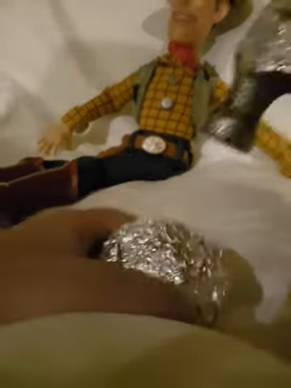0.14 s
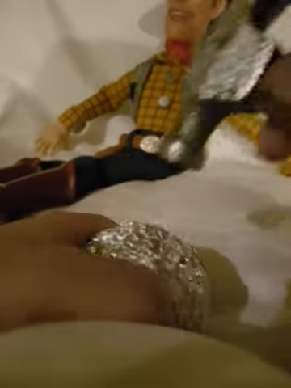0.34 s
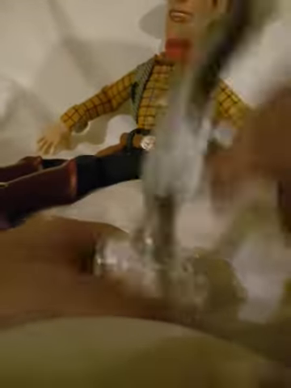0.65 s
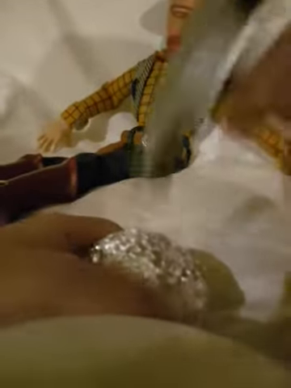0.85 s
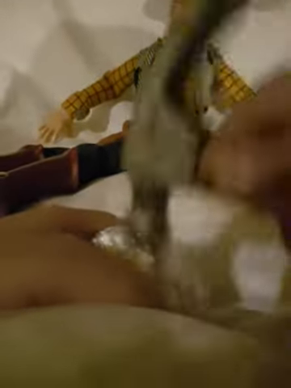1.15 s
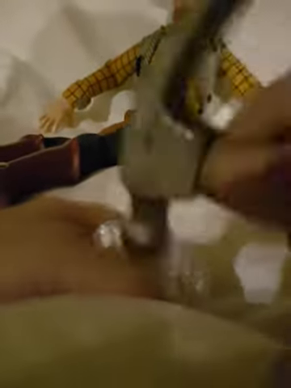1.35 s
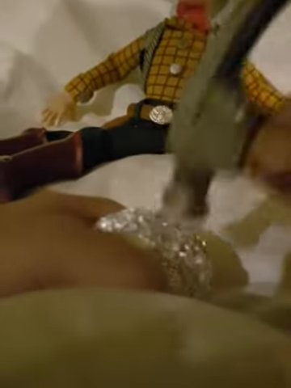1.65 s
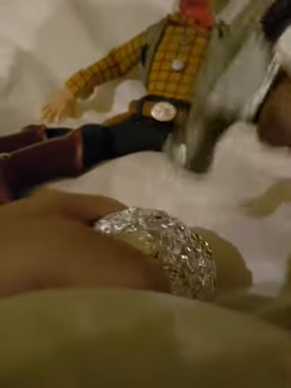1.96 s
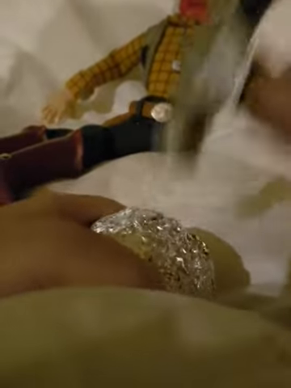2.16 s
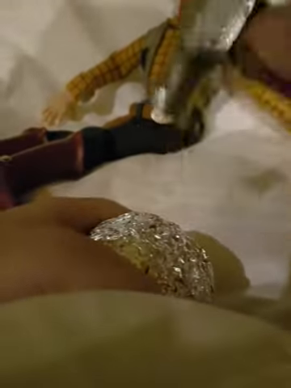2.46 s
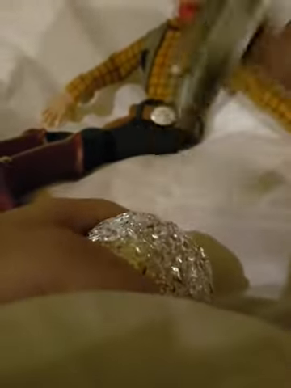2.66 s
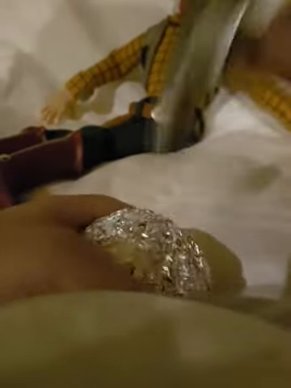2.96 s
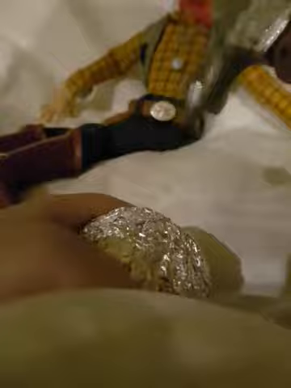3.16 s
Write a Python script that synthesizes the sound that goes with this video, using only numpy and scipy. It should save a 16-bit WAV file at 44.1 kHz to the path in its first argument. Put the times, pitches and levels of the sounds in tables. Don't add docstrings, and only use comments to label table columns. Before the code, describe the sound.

Hammer blows on a foil ball: a faint foil rustle first, then eleven quick even hits, each a short crack and soft thud, with cloth rubs between, in a small bedroom, very close stereo phone microphone.

```python
import sys
import numpy as np
from scipy import signal
from scipy.fft import rfft, irfft, next_fast_len
from scipy.io import wavfile
from scipy.ndimage import map_coordinates

SR = 44100
rng = np.random.default_rng(int(sys.argv[2]) if len(sys.argv) > 2 else 0)


def gain_from_decibels(decibels):
    exponent = np.asarray(decibels, float) / 20
    return 10 ** exponent


def put_to_file(sound):
    columns = np.atleast_2d(sound).T
    safe = np.clip(columns, -1, 1)
    whole_steps = np.round(safe * 32767)
    wavfile.write(sys.argv[1], SR, whole_steps.astype(np.int16))


N = 145530

# start in seconds, thud level in dB, crack level in dB,
# mattress heave level in dB, pitch of the hammer's ring in Hz.
BLOWS = [(0.7271, -16.5, -19, -16, 1900), (.9616, -13.5, -13.5, -15, 1830),
         (1.1882, -12.5, -16.5, -15.5, 1850), (1.4107, -10.5, -13.5, -14, 1770),
         (1.6492, -12.5, -18, -12, 1700), (1.8927, -8, -24, -10, 1800), (2.1191, -8.5, -13.5, -11, 1710),
         (2.3600, -5.5, -12.5, -10.5, 1800), (2.6110, -6, -10.5, -7, 1670), (2.8518, -9.5, -11, -8.5, 2100),
         (3.0857, -4.5, -10, -5, 1950)]
# firmness (a factor on the thud's pace),
# snap level in dB, sizzle level in dB, clink level in dB.
CONTACTS = [(1.1, -27, -25, -17), (1.15, -23, -27, -27), (1.16, -33, -32, -29), (1.18, -28, -27, -29),
            (1.08, -28, -30, -22), (1.07, -27, -26, -22), (.98, -24, -16, -18), (1.18, -24, -21, -15),
            (1.02, -28, -28, -16), (1.02, -16, -23, -12), (1.2, -18, -22, -15)]
# sign of the push, lag in seconds, starting pitch in Hz,
# time for the pitch to sag in seconds, gain in dB.
THUD_AT_PORTS = [
    (-1, 0, 205, .0063, 6.5),
    (1, .00022, 400, .0045, 9.5),
]
# pitch in Hz, level in dB, how late the first crest comes in seconds.
MATTRESS_SWINGS = [
    (37, -1.5, -.003),
    (75, 2, .001),
]
# start in seconds, bump level in dB, pitch in Hz,
# rattle level in dB.
KNOCKS = [(0.7476, -18, 420, -13.5), (0.797, -38, 285, -61), (0.7491, -7.5, 1310, -26),
          (0.7498, -4, 2440, -55), (0.9789, -6.5, 1460, -16.5), (1.0192, -25.5, 395, -49),
          (1.117, -27.5, 600, -43), (1.2068, -6, 1465, -15.5), (1.2306, -24, 367, -49),
          (1.4293, -16.5, 990, -15.5), (1.6592, -12, 1110, -9), (1.8976, -15.5, 229, -22.5),
          (1.9691, -26, 1650, -46), (2.1328, -17, 506, -37), (2.1395, -16.5, 139, -53),
          (2.3767, -3.5, 467, -24), (2.381, -9.5, 210, -58), (2.391, -14, 174, -41),
          (2.8667, -4, 460, -16.5), (2.8711, -8, 197, -54), (2.876, -21, 147, -52),
          (2.915, -36.5, 506, -55), (2.932, -31, 520, -51), (3.1422, -20.5, 487, -49)]
# middle in seconds, length in seconds,
# level in dB, dullness in dB.
STROKES = [(0.198, 0.64, -53.5, -13), (0.447, 0.051, -79, -24), (0.777, 0.17, -55.5, -14),
           (0.866, 0.088, -45, -7.5), (1.016, 0.19, -57.5, -14), (1.109, 0.086, -38.5, -1.5),
           (1.238, 0.13, -49.5, -9.5), (1.337, 0.094, -36, -2.5), (1.47, 0.17, -55, -9.5),
           (1.549, 0.07, -37, -2), (1.693, 0.18, -53.5, -14.5), (1.824, 0.055, -43.5, 1),
           (1.944, 0.18, -52, -12), (2.072, 0.091, -50, 1.5), (2.158, 0.065, -43.5, -12),
           (2.208, 0.12, -52.5, -6.5), (2.393, 0.11, -44.5, -12.5), (2.434, 0.15, -55.5, -11.5),
           (2.649, 0.12, -45.5, -12), (2.716, 0.063, -49.5, -7.5), (2.793, 0.33, -56.5, -4.5),
           (2.895, 0.14, -46.5, -8.5), (2.961, 0.064, -49, -12), (3.102, 0.059, -39.5, 7),
           (3.143, .1, -45, -8), (3.196, 0.053, -47.5, -6.5), (3.242, 0.069, -48.5, 0)]
# time in seconds, level in dB.
TICKS = [(0.089, -41.5), (.651, -49), (0.797, -31), (1.032, -33), (1.212, -46), (1.26, -36), (1.474, -42),
         (1.509, -50), (1.533, -51), (1.54, -50), (1.681, -34), (1.733, -41), (1.757, -36.5), (2.447, -43),
         (2.979, -38), (1.955, -29), (2.424, -31), (2.744, -36), (2.94, -20.5), (2.987, -36),
         (3.165, -23.5)]
# time in seconds, peak level in dB.
PLUCKS = [(.103, -38), (0.195, -23), (0.865, -35), (1.2311, -11), (1.3194, -30), (1.376, -34), (1.548, -22),
          (2.639, -16), (2.894, -14), (3.224, -35), (0.9073, -14), (1.1144, -19), (1.2481, -28),
          (1.387, -30), (1.476, -16), (1.71, -19), (1.9684, -39)]
# time in seconds, level in dB.
HISS_DRIFT = [(0, -55), (0.352, -51), (.6, -55.5), (1.1, -60.5), (1.6, -54), (2.1, -53.5), (2.5, -55),
              (2.8, -53.5), (3.3, -52)]

# frequency in Hz, level in dB.
FOIL_COLOUR = [(600, -10), (1500, 24), (4000, -14), (8000, -8.5), (12000, -6), (15000, -14), (16900, -48),
               (17100, -120)]
CRISP_COLOUR = [(2500, -30), (4500, -3), (9000, 0), (11000, -30)]
SIZZLE_COLOUR = [(9000, -30), (11000, 0), (13500, 0), (16000, -10), (17000, -60)]
DENT_COLOUR = [(300, -30), (600, -0.5), (1000, 3.5), (1700, -6.5), (2900, -6.5), (4500, -19.5), (6000, -29)]
CLOTH_COLOUR = [(200, -32), (350, -1), (750, -9), (1500, -4), (2600, -10.5), (5000, -24), (15700, -36.5),
                (15900, -120)]
ROOM_COLOUR = [(300, -5), (700, -0.5), (1500, 11.5), (2600, 0.5), (4000, -10.5), (8000, -18),
               (15700, -25.5), (15900, -120)]
RIGHT_PORT_COLOUR = [(2600, 1), (3500, -1.5), (5200, 1), (7600, 5.5), (8700, 1), (9500, -2.5), (11000, 1),
                     (13000, 2.5)]
RATTLE_COLOUR = [(300, 6.5), (800, 6.0), (1800, -2), (3000, -11.5),
                 (4000, -18), (8000, -23), (16000, -40), (17000, -120)]
# frequency in Hz, level in dB per Hz.
RUMBLE_COLOUR = [(12, -63), (20, -6), (139, 2.5), (157, -5.5), (262, -6.5), (338, -9), (409, -20),
                 (500, -29), (650, -48), (1100, -120)]
HISS_COLOUR = [(300, -24), (450, -7), (800, -8.5), (1400, -6), (2600, -11), (4000, -21), (15700, -31),
               (15900, -120)]
# frequency in Hz, time to fall by 60 dB in seconds.
ROOM_DECAY = [(200, 0.48), (1500, 0.12), (6000, 0.34), (15000, 0.64)]

THUD_END_HZ, THUD_RISE_S, THUD_FADE_S, THUD_HUM_DB, THUD_HUM_S = 80, .0025, .0034, -27, .04
RING_S, RING_SKEW, RING_SAG, RING_LEFT_DB = .0028, .6, .1, -6
CLINK_HZ, CLINK_DB = 3900, (-6, -11)
SNAP_DB, SNAP_FADE_S = (-4, -17), .0014
DENT_DB, DENT_S = -7, 0.00085
HEAVE_PEAK_S, HEAVE_FROM_S, HEAVE_RISE_S = .0145, .006, .009
HEAVE_TO_S, HEAVE_FADE_S, HEAVE_LEFT_DB = .045, .009, -30
SPRINGS_HZ, SPRINGS_WIDTH_HZ, SPRINGS_DB, SPRINGS_S, SPRINGS_LEFT_DB = 120, 91, -20, .03, -20
KNOCK_CYCLES, KNOCK_SAG, RATTLE_S, KNOCK_LEFT_DB = .7, .08, .0018, -26
DULL_HZ, FIBRES_PER_S, FIBRE_DB, FIBRE_SHARE, RUB_LEFT_DB = 2900, 3200, 12.5, 0.54, -44
TICK_S, TICK_RIGHT_DB, TICK_LOW_HZ = .0015, -4, 4000
TURN_S, TURN_LENGTH_S, TURN_DB = 0.21, 0.44, -47
PLUCK_DB, PLUCK_HZ, PLUCK_WIDTH_HZ = 4.5, 1940, 2700
RUMBLE_DB, RUMBLE_APART, HISS_DB, HISS_RIGHT_DB = -52.5, 0.28, -10, 2
ROOM_DB = -32
BLOW_TIME = np.arange(SR // 6) / SR


def unit(x):
    return x / np.sqrt(np.mean(x ** 2) + 1e-20)


def along(points, hz):
    f, v = np.transpose(points)
    return np.interp(np.log(hz + 1), np.log(f + 1), v)


def filtered(x, response):
    m = next_fast_len(N + SR // 4)
    return irfft(rfft(x, m) * response(np.fft.rfftfreq(m, 1 / SR)), m)[..., :N]


def noise(colour, channels=2):
    white = rng.standard_normal((channels, N))
    return unit(filtered(white, lambda hz: gain_from_decibels(along(colour, hz))))


def add(track, s, x):
    part = track[..., round(s * SR):round(s * SR) + x.shape[-1]]
    part += x[..., :part.shape[-1]]


def swell(t, peak_s):
    return t / peak_s * np.exp(1 - t / peak_s)


def left_quieter(db):
    return gain_from_decibels([[db], [0]])


def house_rumble():
    shared, apart = noise(RUMBLE_COLOUR)
    apart = RUMBLE_APART * apart
    return gain_from_decibels(RUMBLE_DB) * np.array([shared + apart, shared - apart])


def hiss():
    s, db = np.transpose(HISS_DRIFT)
    drift = gain_from_decibels(np.interp(np.arange(N) / SR, s, db) + HISS_DB)
    return drift * noise(HISS_COLOUR) * gain_from_decibels([[0], [HISS_RIGHT_DB]])


def foil_ticks():
    gate, t = np.zeros((2, N)), np.arange(SR // 50) / SR
    for s, db in TICKS:
        add(gate, s, gain_from_decibels(db + np.array([[0], [TICK_RIGHT_DB]])) * np.exp(-(t / (2 * TICK_S)) ** 2))
    turn = np.clip((np.arange(N) / SR - TURN_S) / TURN_LENGTH_S, -.5, .5)
    gate[0] += gain_from_decibels(TURN_DB) * np.cos(np.pi * turn)
    return filtered(gate * noise(FOIL_COLOUR), lambda hz: 1 / (1 + (TICK_LOW_HZ / (hz + 1)) ** 6))


def rubbing():
    slips = rng.random((2, N)) < FIBRES_PER_S / SR
    strength = gain_from_decibels(FIBRE_DB * np.minimum(rng.exponential(size=(2, N)), 2))
    fibres = slips * strength * rng.standard_normal((2, N))
    rough = FIBRE_SHARE * unit(fibres) + (1 - FIBRE_SHARE) * rng.standard_normal((2, N))
    cloth = unit(filtered(rough, lambda hz: gain_from_decibels(along(CLOTH_COLOUR, hz))))
    bright = filtered(cloth, lambda hz: 1 / (1 + (DULL_HZ / (hz + 1)) ** 4))
    t, out = np.arange(N) / SR, np.zeros((2, N))
    for s, length, db, dull_db in STROKES:
        stroke = np.cos(np.pi * np.clip((t - s) / length, -.5, .5)) ** 2.64
        out += gain_from_decibels(db) * stroke * (cloth - bright + gain_from_decibels(-dull_db) * bright)
    flutter = gain_from_decibels(2.1 * map_coordinates(rng.standard_normal(300), [t * 70]))
    return out * flutter * left_quieter(RUB_LEFT_DB)


def thread_plucks():
    snaps = np.zeros(N)
    for s, db in PLUCKS:
        snaps[round(s * SR)] = gain_from_decibels(db + PLUCK_DB)

    def response(f):
        width = 1j * f * PLUCK_WIDTH_HZ
        return width / (PLUCK_HZ ** 2 - f * f + width) / (1 + 1j * f / 5000)

    return filtered(snaps, response) * left_quieter(RUB_LEFT_DB)


def thud():
    out = np.zeros((2, N))
    for (s, thud_db, *_), (firm, *_) in zip(BLOWS, CONTACTS):
        for port, (sign, lag, start_hz, sag, db) in enumerate(THUD_AT_PORTS):
            u = np.maximum(BLOW_TIME - lag, 0) * firm
            turns = THUD_END_HZ * u + (start_hz - THUD_END_HZ) * sag * (1 - np.exp(-u / sag))
            fade = np.exp(-u / THUD_FADE_S) + gain_from_decibels(THUD_HUM_DB) * np.exp(-u / THUD_HUM_S)
            size = (1 - np.exp(-u / THUD_RISE_S)) * fade
            add(out[port], s, sign * gain_from_decibels(thud_db + db) * size * np.sin(2 * np.pi * turns))
    return out


def crack():
    out, t = np.zeros((2, N)), BLOW_TIME
    body = noise(DENT_COLOUR)
    crisp, sizzle = noise(CRISP_COLOUR, channels=1)[0], noise(SIZZLE_COLOUR, channels=1)[0]
    fade = np.exp(-t / SNAP_FADE_S)
    for (s, _, crack_db, _, hz), (_, snap_db, sizzle_db, clink_db) in zip(BLOWS, CONTACTS):
        now = slice(round(s * SR), round(s * SR) + len(t))
        dent = gain_from_decibels(crack_db + DENT_DB) * swell(t, DENT_S) * body[:, now]
        add(out, s - SNAP_FADE_S / 2, dent)
        snap = (gain_from_decibels(snap_db) * crisp[now] + gain_from_decibels(sizzle_db) * sizzle[now]) * fade
        clink_hz = CLINK_HZ * (1 + .03 * rng.normal())
        clink = gain_from_decibels(clink_db) * fade * np.sin(2 * np.pi * clink_hz * t)
        ring = np.sin(2 * np.pi * hz * t * (1 + RING_SAG * (1 - 2 * t / RING_S)) - 2.6)
        ring *= -np.sin(np.pi * np.clip(t / RING_S, 0, 1) ** RING_SKEW)
        for port, (_, lag, *_) in enumerate(THUD_AT_PORTS):
            add(out[port], s, gain_from_decibels(crack_db + RING_LEFT_DB * (1 - port)) * ring)
            foil = gain_from_decibels(SNAP_DB[port]) * snap + gain_from_decibels(CLINK_DB[port]) * clink
            add(out[port], s + lag - .0003, foil)
    return out


def room():
    out = np.zeros((2, N))
    for s, thud_db, crack_db, *_ in BLOWS:
        hz, t, z = signal.stft(rng.standard_normal((2, SR // 4)), SR, nperseg=128)
        level_db = along(ROOM_COLOUR, hz)[:, None] - 60 * t / along(ROOM_DECAY, hz)[:, None]
        tail = signal.istft(z * gain_from_decibels(level_db), SR, nperseg=128)[1]
        tail /= np.std(tail[:, :SR // 50])
        add(out, s + 0.0021, gain_from_decibels((thud_db + crack_db) / 2 + ROOM_DB) * tail)
    return out


def mattress_heave():
    out, t = np.zeros((2, N)), BLOW_TIME
    rise = np.sin(np.pi / 2 * np.clip((t - HEAVE_FROM_S) / HEAVE_RISE_S, 0, 1)) ** 2
    size = rise * np.exp(-np.maximum(t - HEAVE_TO_S, 0) / HEAVE_FADE_S)
    for s, _, _, heave_db, _ in BLOWS:
        swing = np.zeros(len(t))
        for f, db, late in MATTRESS_SWINGS:
            swing_hz = f * (1 + .015 * rng.normal())
            swing += gain_from_decibels(db) * np.cos(2 * np.pi * swing_hz * (t - HEAVE_PEAK_S - late))
        add(out, s, gain_from_decibels(heave_db - 11) * left_quieter(HEAVE_LEFT_DB) * size * swing)
    return out


def springs():
    size, t = np.zeros(N), np.arange(SR // 4) / SR
    for s, _, _, heave_db, _ in BLOWS:
        add(size, s, gain_from_decibels(heave_db + SPRINGS_DB) * swell(t, SPRINGS_S))
    white = rng.standard_normal(N)
    grumble = filtered(white, lambda hz: 1 / (1 + ((hz - SPRINGS_HZ) / SPRINGS_WIDTH_HZ) ** 4))
    return size * unit(grumble) * left_quieter(SPRINGS_LEFT_DB)


def knocks():
    out, t = np.zeros(N), np.arange(SR // 20) / SR
    rattle = noise(RATTLE_COLOUR, channels=1)[0]
    for s, db, hz, rattle_db in KNOCKS:
        turns = np.log1p(KNOCK_SAG * t * hz) / KNOCK_SAG / (2 * np.pi) * 2 * np.pi
        bump = -swell(t, KNOCK_CYCLES / hz) / np.e * np.e * np.sin(2 * np.pi * turns)
        shake = swell(t, RATTLE_S) * rattle[round(s * SR):][:len(t)]
        add(out, s, gain_from_decibels(db) * bump + gain_from_decibels(rattle_db) * shake)
    return out * left_quieter(KNOCK_LEFT_DB)


def scene():
    left, right = hiss() + foil_ticks() + rubbing() + thread_plucks() + crack() + room()
    right = filtered(right, lambda hz: gain_from_decibels(along(RIGHT_PORT_COLOUR, hz)))
    shaken = house_rumble() + thud() + mattress_heave() + springs() + knocks()
    return np.array([left, right]) + shaken


def low_pass(x):
    return signal.sosfilt(signal.butter(12, 16860, fs=SR, output="sos"), x)


def record(dry):
    kept = filtered(dry, lambda hz: np.clip((16900 - hz) / 600, 0, 1))
    return low_pass(np.clip(kept, -.995, .995))


dry = scene()
out = record(dry)
put_to_file(out)
```